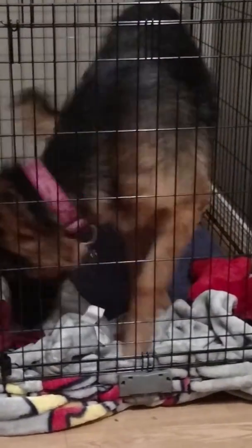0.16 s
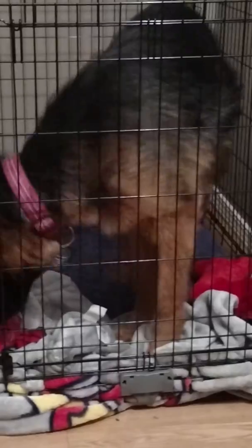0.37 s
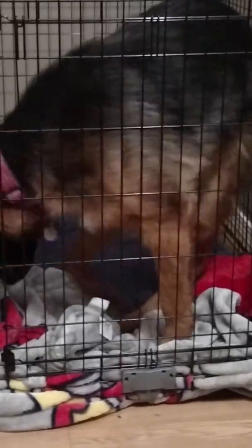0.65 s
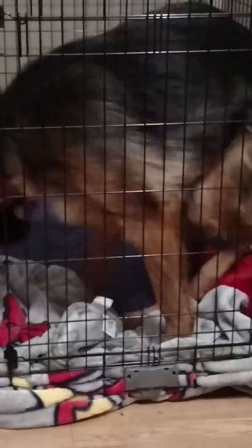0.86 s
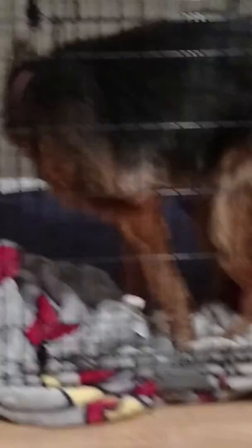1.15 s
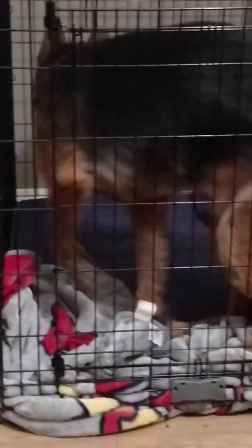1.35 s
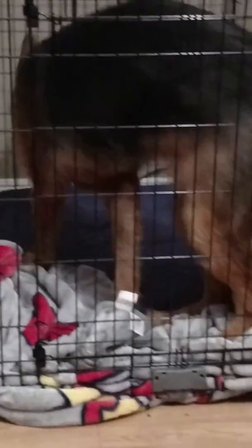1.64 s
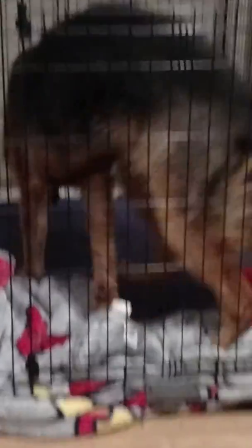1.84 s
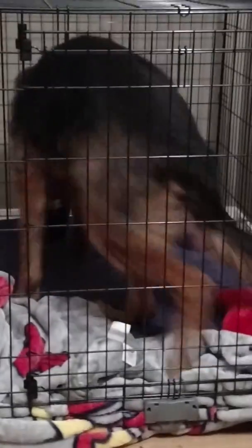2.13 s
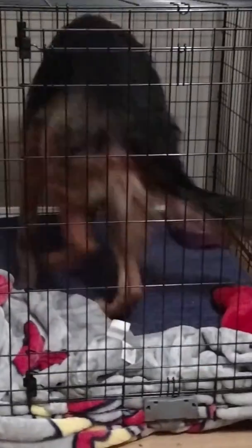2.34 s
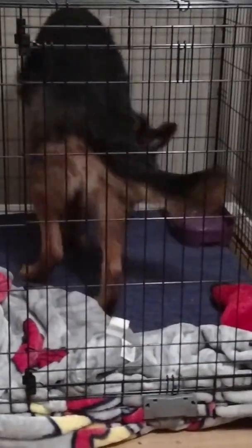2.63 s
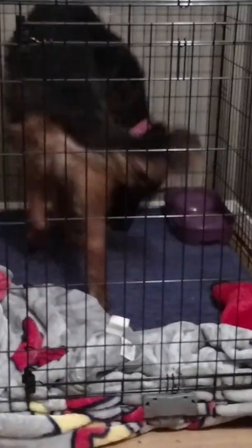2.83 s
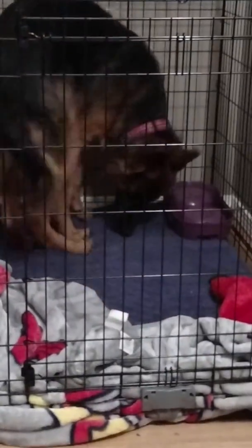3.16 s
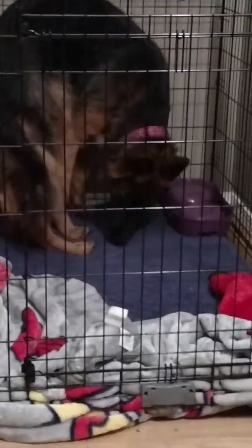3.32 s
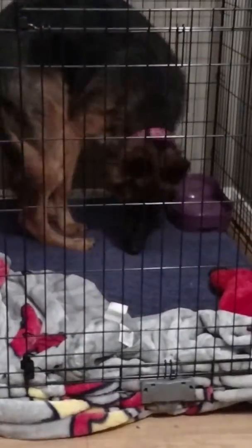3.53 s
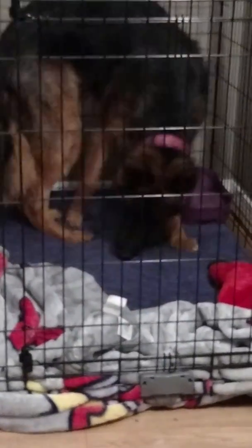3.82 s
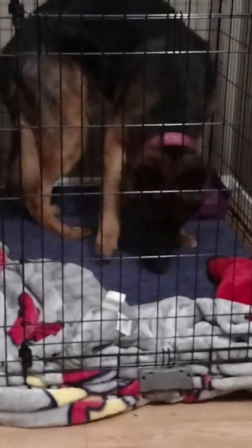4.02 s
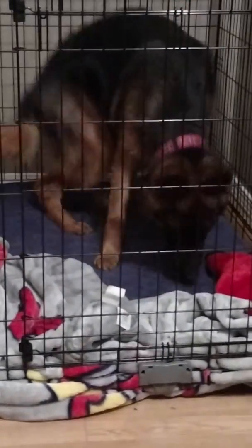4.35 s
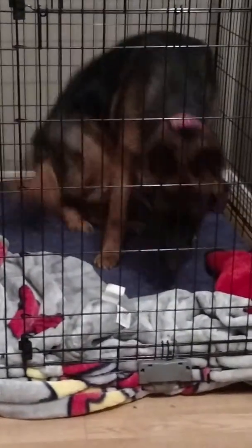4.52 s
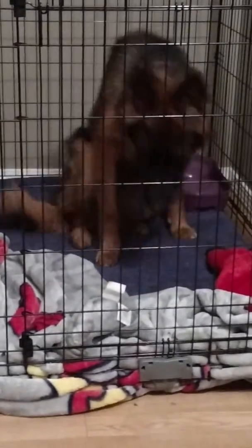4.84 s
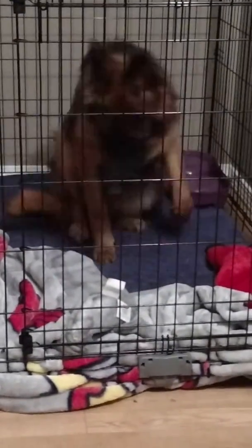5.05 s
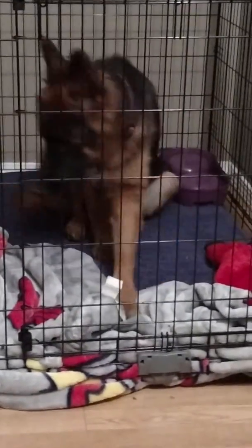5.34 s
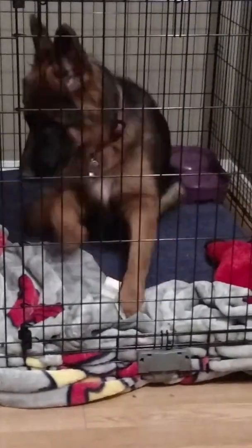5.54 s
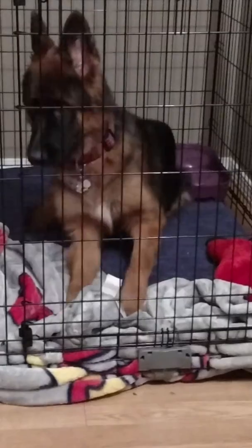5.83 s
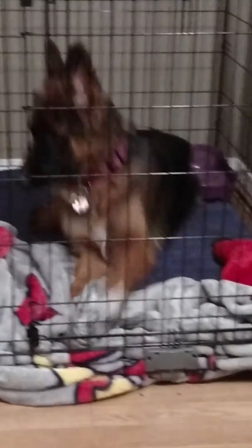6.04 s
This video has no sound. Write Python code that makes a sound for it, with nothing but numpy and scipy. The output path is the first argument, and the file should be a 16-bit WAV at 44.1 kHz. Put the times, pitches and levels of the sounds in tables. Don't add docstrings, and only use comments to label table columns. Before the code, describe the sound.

A small room at home, with steady low hum and soft microphone hiss, heard through a nearby phone. A large dog moves in a wire crate. At 0.2 s a couple of dull paw thumps knock the plastic floor tray, then until 1.6 s there are only soft pats, rubbing cloth and faint fur brushing wires. Light steps at 1.7 and 2.0 s lead to the loudest event at 2.2 s: a deep hollow boom, a hard slap against the wires and a quick chatter. Smaller thuds come at 2.6 and 3.0 s, quieter shuffling follows, then dull knocks at 3.7 and 4.2 s with dragging cloth. The tray gives short rising creaks at 4.7 and 4.8 s. A strong round thump lands at 5.3 s, a lighter one at 5.8 s, tiny metallic tag ticks near 5.9 s, and last soft thumps around 6 s.

```python
import sys
import numpy as np
from scipy import signal
from scipy.fft import rfft, irfft
from scipy.io import wavfile

SR = 44100
rng = np.random.default_rng(int(sys.argv[2]) if len(sys.argv) > 2 else 0)


def convert_level_to_amplitude(level_db):
    exponent = np.asarray(level_db, float) / 20
    return 10 ** exponent


def wav_out(sig):
    wavfile.write(sys.argv[1], SR, np.round(np.clip(np.atleast_2d(sig).T, -1, 1) * 32767).astype(np.int16))


N = 272529


def rms_one(x):
    return x / np.sqrt(np.mean(x ** 2) + 1e-20)


def at_hz(points, hz):
    table_hz, value = np.transpose(points)
    return np.interp(np.log(hz), np.log(table_hz), value)


def noise():
    return rng.standard_normal(N)


def band(x, low_hz, high_hz):
    sos = signal.butter(2, [low_hz, min(high_hz, 0.45 * SR)], "band", fs=SR, output="sos")
    return signal.sosfilt(sos, x)


def drift(rate_hz):
    r = np.exp(-80 * np.pi * rate_hz / SR)
    slow = signal.lfilter([1], [1, -2 * r, r * r], rng.standard_normal(N // 40 + 2002))[2000:]
    return np.interp(np.arange(N) / 40, np.arange(len(slow)), rms_one(slow))


def ring(x, hz, t60_s):
    r, w = convert_level_to_amplitude(-60 / (t60_s * SR)), 2 * np.pi * hz / SR
    return signal.lfilter([0, np.sin(w)], [1, -2 * r * np.cos(w), r * r], x + 1e-18)


def coloured(spectrum):
    hz = np.maximum(np.arange(N // 2 + 1) * SR / N, 1)
    return rms_one(irfft(rfft(noise()) * convert_level_to_amplitude(at_hz(spectrum, hz)), N))


def add(out, start_s, piece):
    at = round(start_s * SR)
    out[at:at + len(piece)] += piece[:N - at]


def strokes(rows):
    t = np.arange(N) / SR
    return sum(convert_level_to_amplitude(db) * np.clip(1 - abs(t - middle) / half, 0, 1) for middle, half, db in rows)


# (start_s, peak_db, boom_hz, boom_t60_s, overtone_db)
LANDINGS = [(0.162, -25.5, 152, 0.025, -16), (0.218, -30, 237, 0.063, -19), (1.671, -27.5, 201, 0.1, -21),
            (1.928, -32.5, 195, 0.089, -7.5), (2.02, -17.5, 268, 0.015, -12),
            (2.149, -28, 216, 0.075, -1.5), (2.216, -6, 224.5, .053, -11.5), (2.566, -22, 159, 0.019, -4),
            (2.968, -26, 188.5, 0.18, -12), (3.049, -35, 390, 0.037, -5), (3.203, -35.5, 250, 0.032, -15),
            (3.511, -29, 161, .083, -37), (3.735, -24, 206, 0.023, 0.5), (3.758, -27, 132, 0.063, 3.5),
            (4.194, -23.5, 131, 0.017, -0.5), (5.326, -28, 368.5, 0.13, -21), (5.409, -33, 230, .04, -7),
            (5.499, -37, 190, 0.08, -2.5), (5.797, -26.5, 141, 0.047, -5), (5.953, -24, 244, 0.038, -11),
            (6.047, -25, 205, 0.052, -29)]
# (start_s, peak_db, boom_hz, boom_t60_s)
REBOUNDS = [(0.227, -26, 250, 0.023), (0.244, -26.5, 212, 0.073), (2.032, -23, 312, 0.12),
            (2.054, -20, 153, 0.028), (2.07, -23.5, 177, 0.018), (2.227, -4.5, 193, 0.027),
            (2.243, -9, 295, 0.04), (2.264, -19.5, 241, 0.068), (2.579, -22, 168, 0.046),
            (2.981, -24, 164, 0.066), (2.99, -23, 175, 0.022), (3.061, -32.5, 184, 0.091),
            (3.532, -24.5, 133, 0.055), (3.744, -17.5, 112, 0.07), (4.204, -21, 178.7, 0.079),
            (4.222, -22, 267, 0.038), (5.338, -12.5, 283, 0.035), (5.347, -17, 163, 0.038),
            (5.963, -28, 175, 0.072), (6.058, -24.5, 257, .054), (6.067, -22, 179, 0.013)]
# (start_s, peak_db, boom_hz)
SHIFTS = [(0.196, -44, 172), (0.327, -32, 210), (0.382, -39, 122), (0.522, -38, 180), (0.608, -40.5, 117),
          (0.692, -43, 91), (0.818, -39, 91.5), (0.952, -35.5, 91), (1.036, -36, 136), (1.134, -38, 90.5),
          (1.25, -42.5, 305), (1.348, -45, 92), (1.7, -35, 121), (3.24, -39, 140), (4.52, -44, 296),
          (4.57, -43, 260), (2.697, -39, 367), (3.724, -30.5, 106), (4.338, -39, 202), (4.495, -41.5, 320),
          (5.005, -36, 86), (5.045, -36, 127), (5.546, -32.5, 191), (5.942, -31, 167)]
# (start_s, peak_db, boom_hz)
RIM = [
    (1.669, -44, 472),
    (1.681, -43, 444),
    (2.566, -31, 510),
    (3.725, -31, 472),
    (5.797, -27, 277),
    (5.803, -27.5, 518),
    (5.811, -41, 446),
]


def thumps():
    out, t = np.zeros(N), np.arange(SR // 5) / SR
    booms = list(LANDINGS)
    booms += [(*row, -21) for row in REBOUNDS]
    booms += [(*row, 0.05, -16) for row in SHIFTS]
    booms += [(*row, 0.049, -37) for row in RIM]
    for start_s, peak_db, hz, t60_s, over_db in booms:
        push = np.sin(np.pi * np.clip(t * hz * 2.22, 0, 1)) ** 2
        boom = -ring(np.diff(push, prepend=0), hz, np.clip(t60_s, 0.01, 0.3))
        over_hz = hz * (1.83 + 0.42 * rng.random())
        over = ring(np.diff(push ** 3, prepend=0), over_hz, 0.032)
        thump = boom / abs(boom).max() + convert_level_to_amplitude(over_db) * over / abs(over).max()
        add(out, start_s, convert_level_to_amplitude(peak_db - 2) * thump)
    return out


def colours(x):
    dull = signal.sosfilt(signal.butter(3, 4500, fs=SR, output="sos"), x[:3])
    snap = band(x[3], 3000, 6500) + convert_level_to_amplitude(-17) * band(x[3], 7500, 16000)
    return band(dull[0], 437, 644), band(dull[1], 807, 1850), band(dull[2], 1000, 3250), snap


# (start_s, peak_db, sharpness_db, hollow_knock_db, snap_db)
SLAPS = [(0.216, -37.5, -7, 4, -17), (1.25, -45, -8, 1, -16), (1.664, -45.5, -2, 8, -12),
         (2.022, -37.5, 8, 17.5, -24), (2.213, -26, -3.5, 9, -11.5), (2.561, -36.5, -11, -2, -12),
         (2.569, -31.5, -17, 1, -25), (2.968, -45.5, -10, 12, -28), (3.055, -41, -16, 3, -34),
         (3.72, -43.5, -24, 13.5, -31), (3.745, -28, -26, 4.5, -22.5), (4.202, -31.5, -8, 3, -17),
         (4.209, -32.5, -13, -3, -23), (4.848, -46.5, -9, 5, -28), (5.326, -39.5, -21, -4, -34),
         (5.334, -28, -11.5, 2.5, -26), (5.798, -40, -7, 2, -32), (5.946, -36.5, -28, 4, -23),
         (6.053, -42, -15, -18, -32)]
# (start_s, peak_db, hollow_knock_db)
TAPS = [
    (0.531, -59, 11),
    (0.956, -56, 14.5),
    (1.93, -51.5, 15),
    (2.149, -56, 8),
    (2.702, -50.5, 8),
    (3.201, -60, 16.5),
    (3.518, -51, 6),
    (4.738, -54, 8),
    (5.544, -46.5, 6),
]
# (start_s, peak_db, sharpness_db)
CHATTER = [(0.226, -39, -14), (0.241, -42.5, -16), (0.27, -48.5, -11), (1.676, -40.5, -27),
           (2.03, -30.5, -3.5), (2.223, -16, -5.5), (2.246, -34, -19), (2.6, -41, -22), (2.977, -38, -22),
           (3.734, -35.5, -4), (3.758, -36, -20), (3.8, -46, -7), (4.244, -40.5, -12), (5.348, -28.5, -24),
           (5.37, -43, -13), (5.811, -42, -7), (5.961, -35.5, -30), (6.061, -37, -30)]
# (pitch_hz, level_db, t60_s)
WIRES = [(997, -0.5, 0.015), (1049, -16, 0.34), (1288, 3, 0.012), (1780, -17, 0.019), (2340, -20, 0.02),
         (3400, -23, 0.01)]


def slaps():
    # (start_s, peak_db, sharpness_db, length_s, hollow_knock_db, snap_db)
    touches = [(s, db, sharp, 0.011, knock, snap) for s, db, sharp, knock, snap in SLAPS]
    touches += [(s, db, -26, 0.013, knock, -29) for s, db, knock in TAPS]
    touches += [(*row, 0.0098, 0, -34.5) for row in CHATTER]
    near, far, t = np.zeros(N), np.zeros(N), np.arange(SR // 5) / SR
    clicks = np.tile(t == 0, (4, 1)) * 1.0
    smooth = [part / np.linalg.norm(part) for part in colours(clicks)]
    for start_s, peak_db, sharp_db, length_s, knock_db, snap_db in touches:
        swell = (1 - np.exp(-t / 0.0038)) * np.exp(-t / length_s)
        contact = rng.standard_normal((4, len(t))) * swell
        wires = 0
        for hz, db, t60_s in WIRES:
            luck_db = 3 * rng.standard_normal()
            wires = wires + convert_level_to_amplitude(db + luck_db) * ring(contact[1], hz, min(t60_s, 0.3))
        levels = convert_level_to_amplitude(peak_db - 3 + np.array([knock_db - 1, 0, sharp_db, snap_db - 2.5, -7]))
        parts = [g * p / abs(p).max() for p, g in zip((*colours(contact), wires), levels)]
        add(near, start_s, sum(parts))
        even = sum(np.linalg.norm(part) * click for part, click in zip(parts, smooth))
        add(far, start_s + length_s, even)
    return near, far


# (pitch_hz, width_hz, added_share), a negative share makes a gap
TRAY = [(711, 350, -0.59), (1065, 147, 1), (2410, 130, 0.2), (3290, 97, 0.74)]


def tray(x):
    out = x
    for hz, width_hz, share in TRAY:
        r = np.exp(-np.pi * width_hz / SR)
        top = (1 - r * r) / 2 * np.array([1, 0, -1])
        bottom = [1, -2 * r * np.cos(2 * np.pi * hz / SR), r * r]
        out = out + share * signal.lfilter(top, bottom, x)
    return out


def glides(rows):
    out = np.zeros(N)
    for start_s, length_s, start_hz, end_hz, peak_db in rows:
        u = np.arange(round(length_s * SR)) / (length_s * SR)
        phase = 2 * np.pi * np.cumsum(start_hz + (end_hz - start_hz) * u) / SR
        add(out, start_s, convert_level_to_amplitude(peak_db) * np.sin(np.pi * u ** 0.49) ** 2 * np.sin(phase))
    return out


# (start_s, length_s, start_hz, end_hz, peak_db)
CREAKS = [
    (4.717, 0.046, 264, 462, -34.5),
    (4.832, 0.037, 242, 457, -43),
]


def creaks():
    return glides(CREAKS)


# (start_s, peak_db)
TAG = [
    (5.851, -78),
    (5.865, -64),
    (5.872, -74),
    (5.935, -74),
]


def tag():
    click = np.zeros(N)
    for start_s, peak_db in TAG:
        click[round(start_s * SR)] = convert_level_to_amplitude(peak_db)
    out = 8 * band(click, 4500, 15000)
    # (share, pitch_hz, t60_s)
    for share, hz, t60_s in [(1.1, 5700, 0.02), (0.6, 6300, 0.015), (0.6, 7300, 0.02),
                             (0.5, 12400, 0.012), (0.5, 14100, 0.015), (0.6, 14750, 0.09)]:
        out += share * ring(click, hz, t60_s)
    return out


def stirred():
    out, t = np.zeros(N), np.arange(SR) / SR
    for start_s, peak_db, *_ in LANDINGS:
        add(out, start_s, convert_level_to_amplitude(peak_db - 153 * t) * np.clip(t / 0.028, 0, 1))
    return out


# (time_s, level_db)
EFFORT = [(0.0, -56.5), (0.34, -52.5), (1.55, -60), (1.69, -61.5), (1.98, -52), (2.2, -43.5), (2.56, -51),
          (2.75, -56), (3.53, -56.5), (3.72, -49), (3.99, -55), (4.75, -51.5), (5.2, -54), (5.46, -53),
          (5.66, -55.5), (5.87, -58.5), (5.99, -54.5), (6.18, -51.5)]
# (pitch_hz, level_db)
RUB = [(260, -44.5), (450, -10.5), (817, -4.5), (1300, -10), (1650, -19.5), (2440, -20.5), (3060, -26),
       (6000, -38.5), (7800, -63), (13200, -120)]
# (middle_s, half_length_s, level_db)
HEAVES = [(0.2, 0.21, -49), (0.6, 0.18, -61), (1.1, 0.27, -52.5), (1.72, 0.16, -48), (1.92, 0.09, -55),
          (2.15, 0.089, -55), (2.5, 0.24, -55), (3.1, 0.15, -61), (3.45, 0.34, -59), (3.96, 0.085, -62),
          (4.88, 0.088, -55), (5.05, 0.16, -52), (5.45, 0.13, -56), (6.15, 0.11, -50)]
# (middle_s, half_length_s, level_db)
BRUSHES = [(0.13, 0.093, -62.5), (0.443, 0.087, -61.5), (0.65, .06, -65.5), (1.08, 0.097, -59.5),
           (1.23, 0.052, -64), (1.38, .08, -62.5), (2.75, .1, -63), (3.466, .12, -64), (4.004, .12, -66),
           (4.68, 0.12, -64), (5.08, 0.17, -62), (5.63, 0.25, -66), (5.996, .1, -61)]
# (middle_s, half_length_s, level_db)
DRAGS = [
    (0.85, .1, -72),
    (4.15, 0.12, -63),
    (4.28, 0.17, -64),
    (4.65, 0.16, -65),
    (5.15, 0.13, -68.5),
]


def shuffle():
    stir = stirred()
    effort_db = np.interp(np.arange(N) / SR, *np.transpose(EFFORT))
    effort_db = effort_db - effort_db.mean()
    lumps = drift(7.4)
    rumble_level = convert_level_to_amplitude(-66.5 + 0.86 * effort_db) + strokes(HEAVES)
    pats_level = convert_level_to_amplitude(-54 + effort_db) + convert_level_to_amplitude(-22) * stir
    rub_level = convert_level_to_amplitude(-64 + 0.42 * effort_db) + convert_level_to_amplitude(-31.5) * stir
    rumble = rms_one(band(noise(), 23, 82)) * rumble_level
    pats = rms_one(band(noise(), 70, 301) * convert_level_to_amplitude(2 * lumps)) * pats_level
    rub = rms_one(coloured(RUB) * convert_level_to_amplitude(lumps + 2.64 * drift(17))) * rub_level
    wire_hum = band(band(noise(), 1160, 1410), 1000, 1580)
    brushed = rms_one(wire_hum * convert_level_to_amplitude(2.3 * drift(11))) * strokes(BRUSHES)
    dragged = rms_one(band(noise(), 610, 2100) * convert_level_to_amplitude(3.6 * drift(20))) * strokes(DRAGS)
    return rumble + pats + rub + brushed + dragged


# (pitch_hz, t60_s)
ROOM = [(80, 0.33), (210, 0.23), (560, 0.36), (1470, 0.52), (3000, 0.39), (6000, 0.32)]


def room(x):
    t = np.arange(SR) / SR
    white = rng.standard_normal((2, SR))
    edges_hz = 60 * 2 ** np.arange(0, 8.1, 0.5)
    tail = 0
    for k, (low, high) in enumerate(zip(edges_hz, edges_hz[1:])):
        fade = convert_level_to_amplitude(-60 * t / at_hz(ROOM, np.sqrt(low * high)))
        tail = tail + band(white[k % 2], low, high) * fade
    tail = tail * np.clip((t - 0.006) / 0.0023, 0, 1)
    return signal.fftconvolve(x, tail / np.sqrt(np.sum(tail ** 2)))[:N]


# (start_s, length_s, start_hz, end_hz, peak_db)
SWAY = [
    (1.06, 0.47, 4.7, 8, -39),
    (1.74, 0.46, 5, 7, -45),
]


def hand_sway():
    return glides(SWAY)


# (pitch_hz, level_db)
HUM = [(12, -33), (20, 13), (70, -7), (119, 3.5), (207, -6), (465, -8.5), (614, -19), (1230, -17),
       (2150, -25), (10500, -38), (15500, -38.5)]
# (pitch_hz, half_width_hz, level_db)
WHINE = [(10670, 160, -88.5)]


def house():
    out = convert_level_to_amplitude(-54.5) * coloured(HUM)
    for hz, width_hz, db in WHINE:
        out = out + convert_level_to_amplitude(db) * rms_one(band(noise(), hz - width_hz, hz + width_hz))
    return out


def scene():
    small_panel = signal.butter(2, 70, "high", fs=SR, output="sos")
    low = signal.sosfilt(small_panel, thumps() + creaks())
    near, far = tray(np.array(slaps()))
    walls = room(convert_level_to_amplitude(-7.5) * low + convert_level_to_amplitude(-6) * far)
    return (low + near + tag() + walls + shuffle() + house() + hand_sway())[None]


def band_limit(x):
    return signal.sosfilt(signal.butter(12, 15660, fs=SR, output="sos"), x)


def record(dry):
    cut = signal.cheby2(12, 60, 16100, fs=SR, output="sos")
    mix = signal.sosfilt(cut, dry)
    return band_limit(mix)


dry = scene()
out = record(dry)
wav_out(out)
```